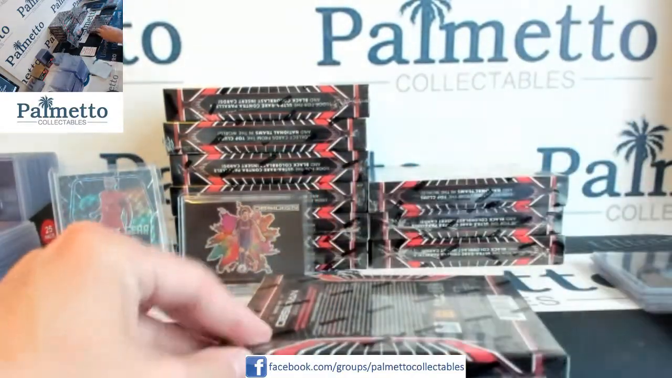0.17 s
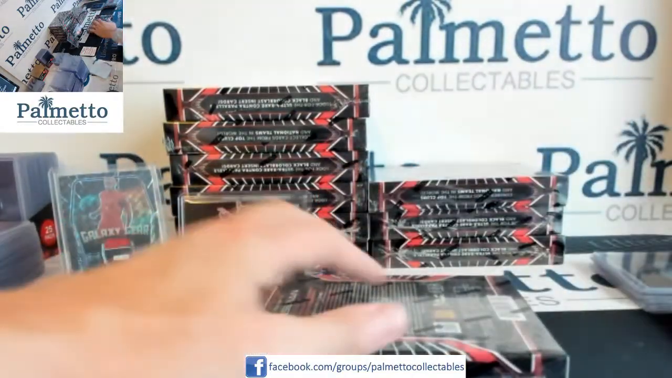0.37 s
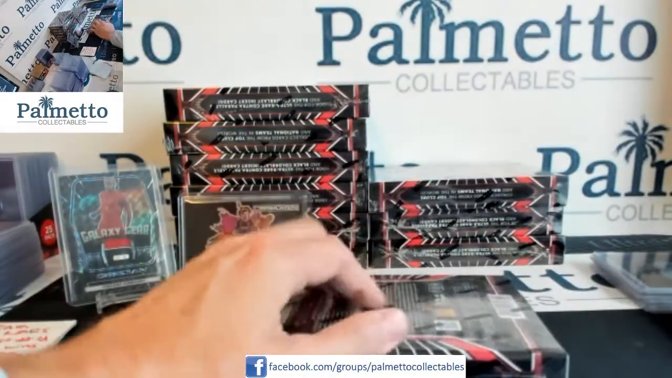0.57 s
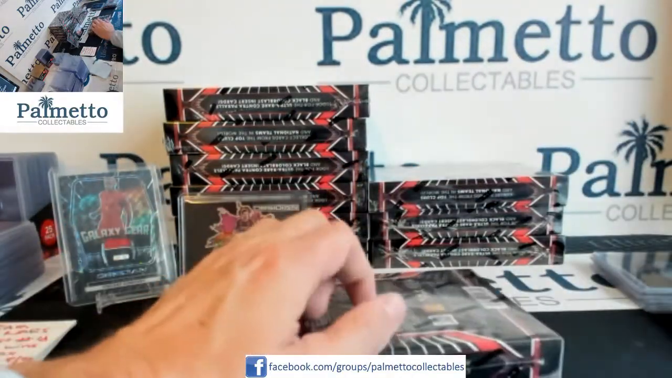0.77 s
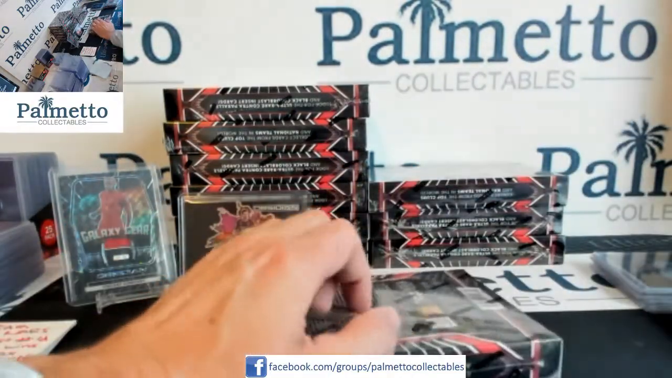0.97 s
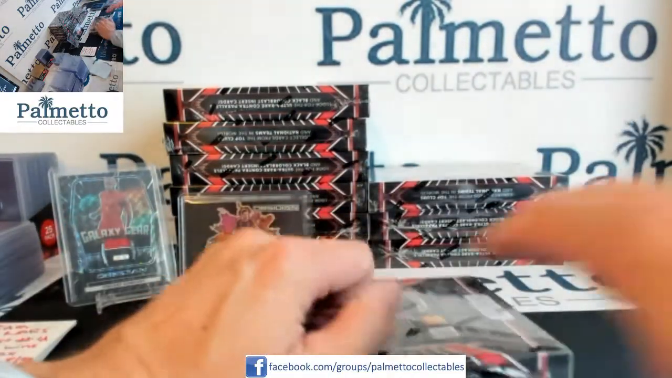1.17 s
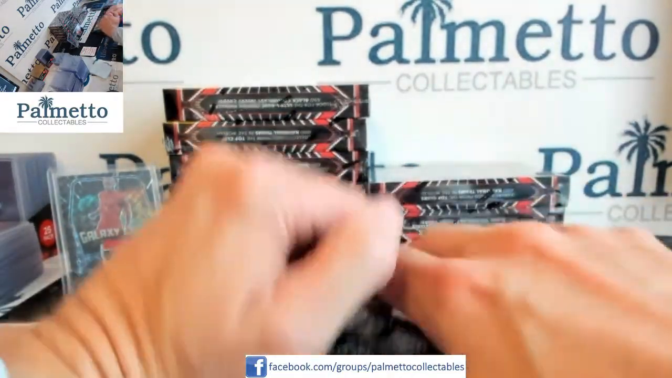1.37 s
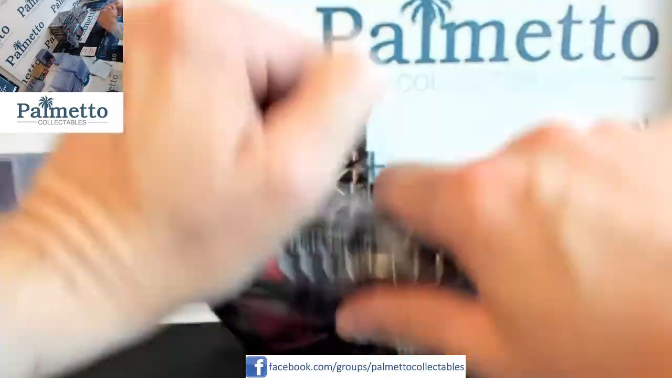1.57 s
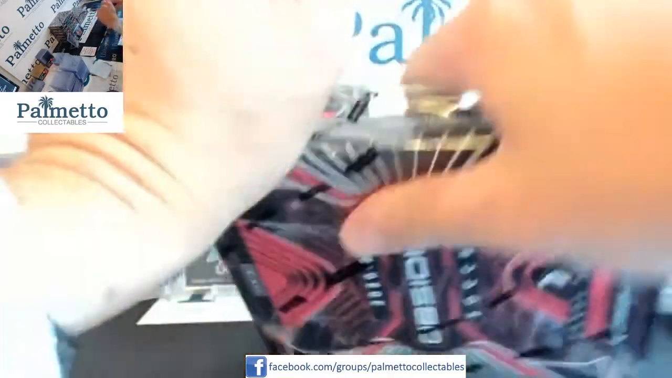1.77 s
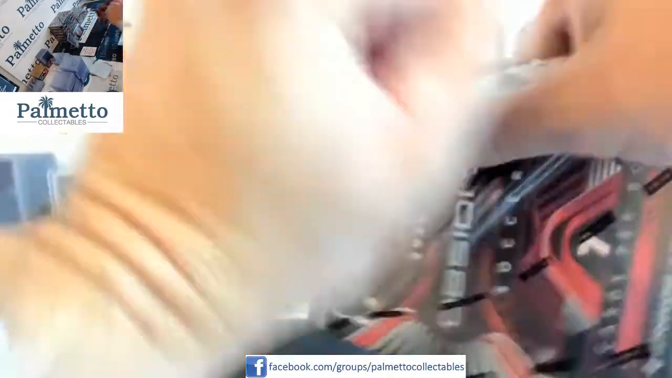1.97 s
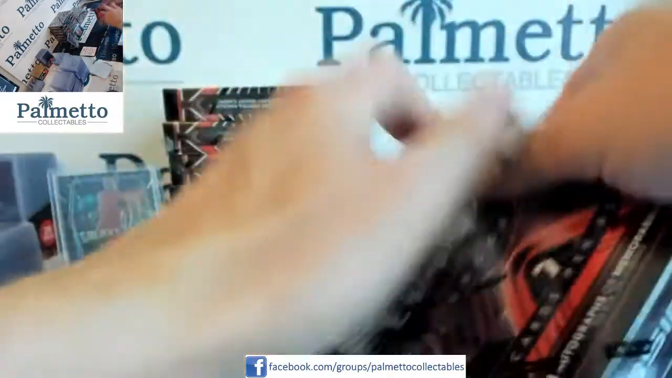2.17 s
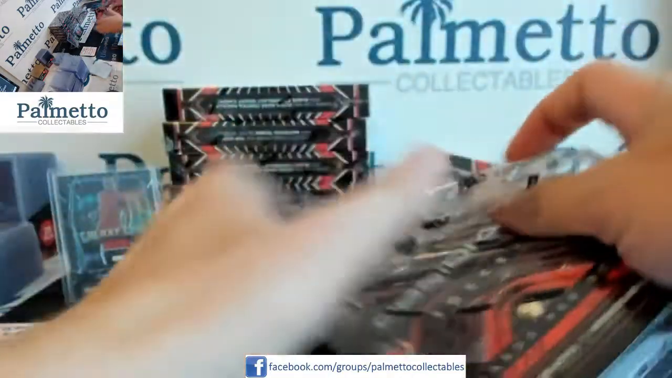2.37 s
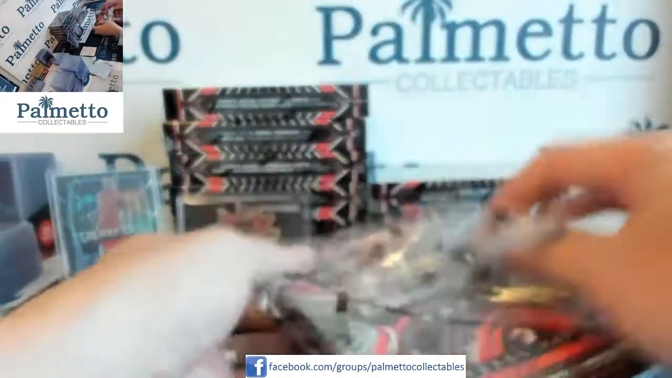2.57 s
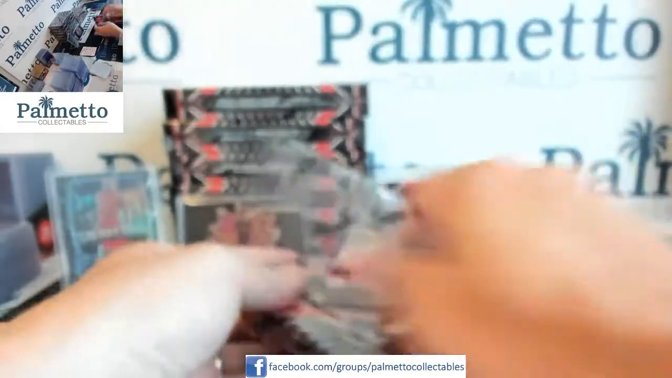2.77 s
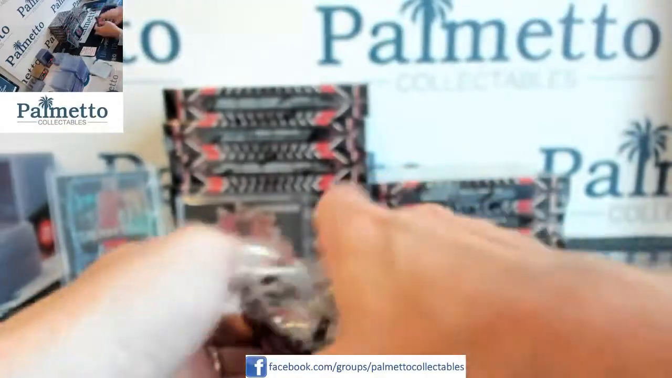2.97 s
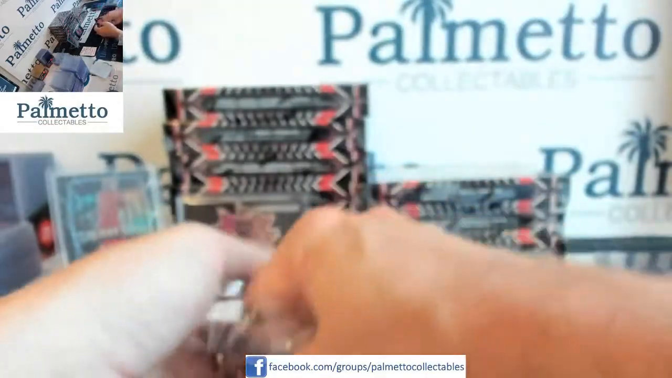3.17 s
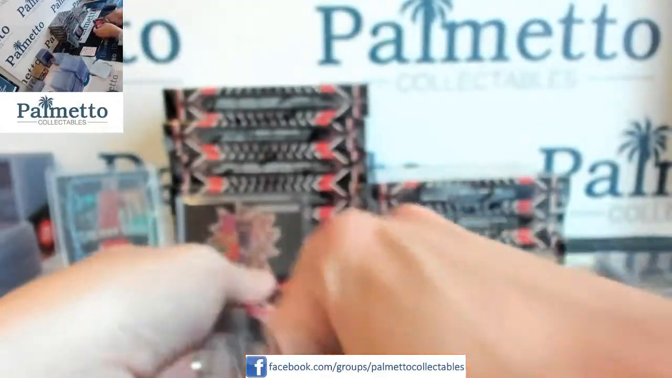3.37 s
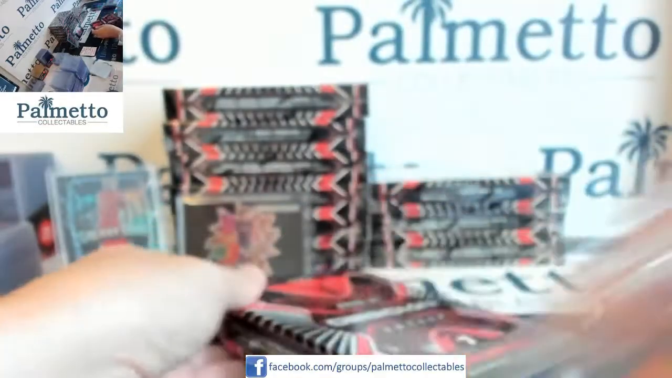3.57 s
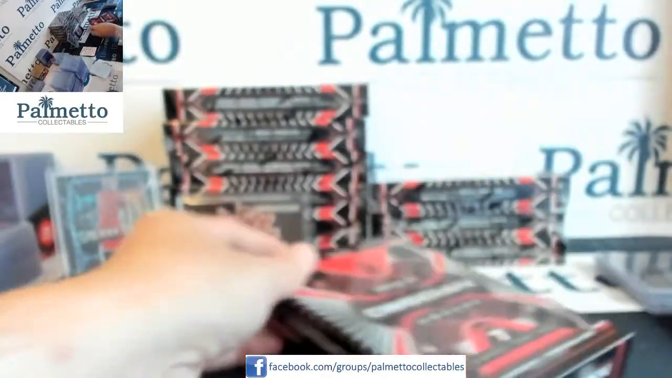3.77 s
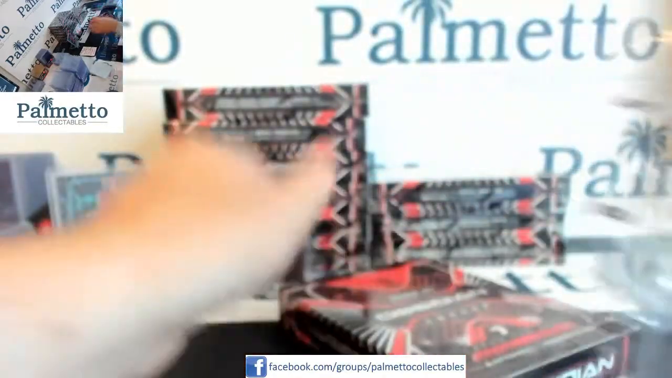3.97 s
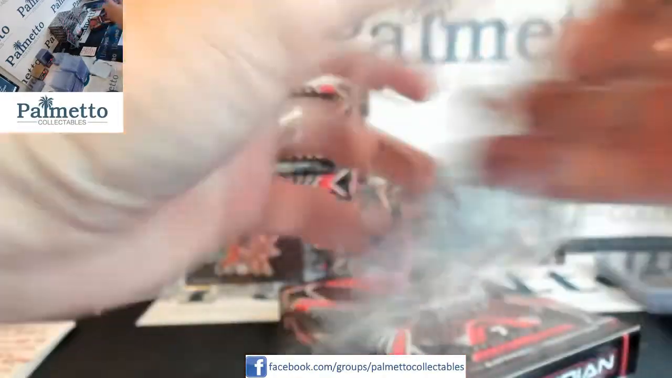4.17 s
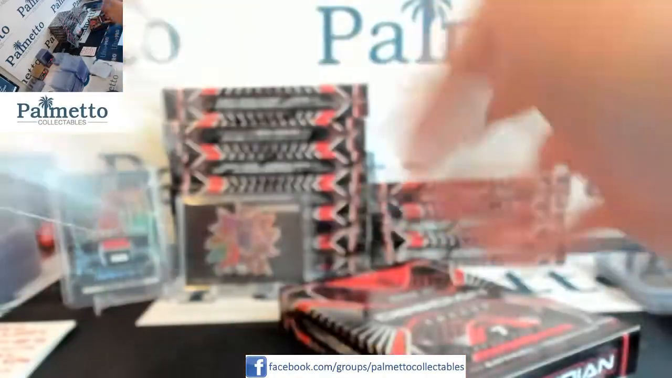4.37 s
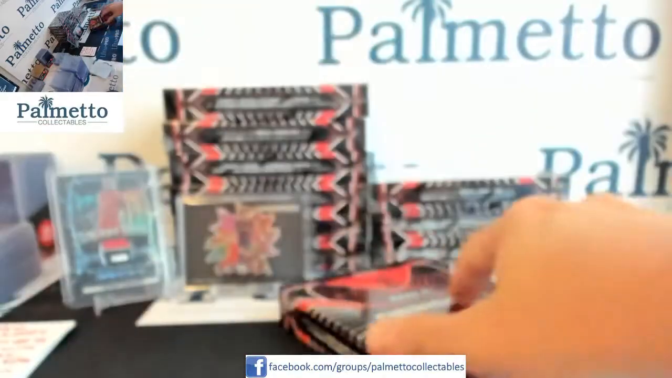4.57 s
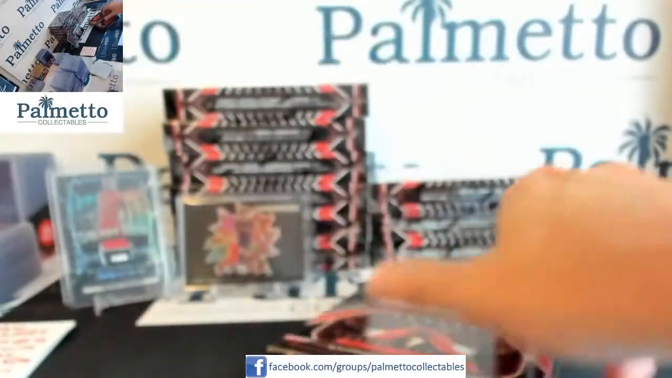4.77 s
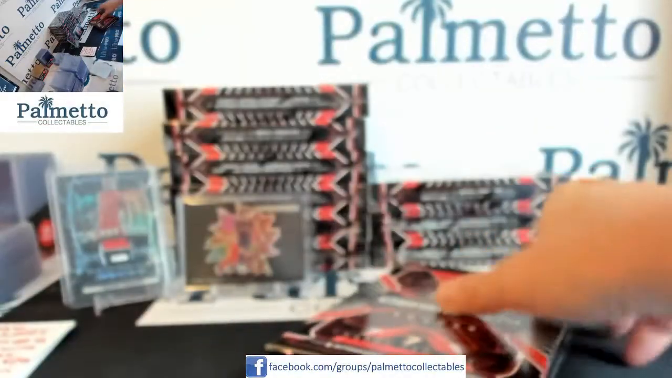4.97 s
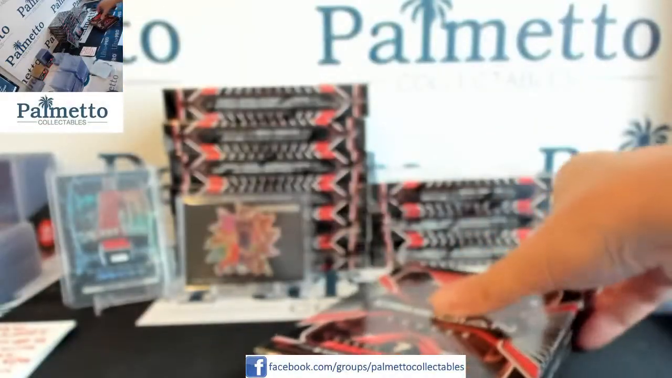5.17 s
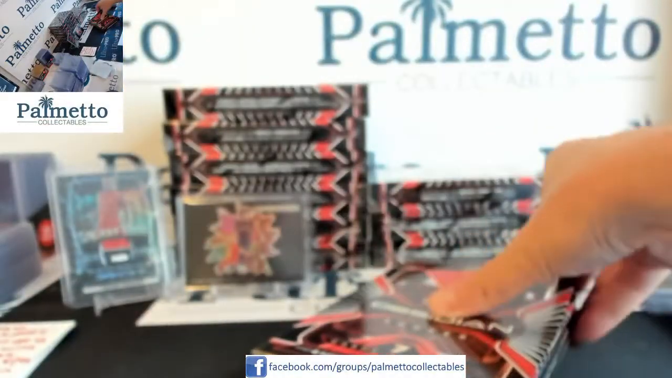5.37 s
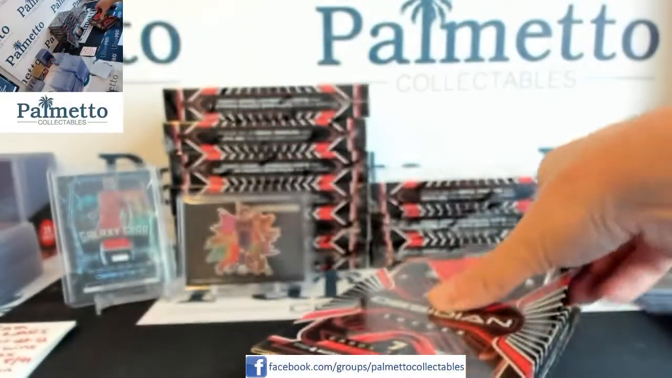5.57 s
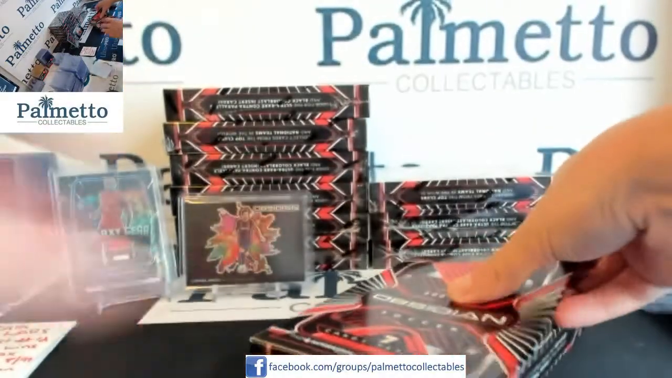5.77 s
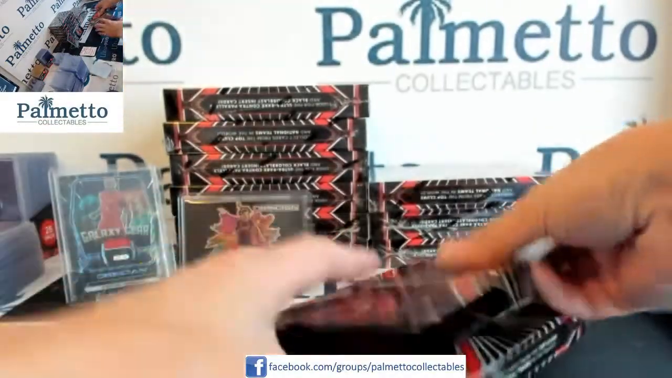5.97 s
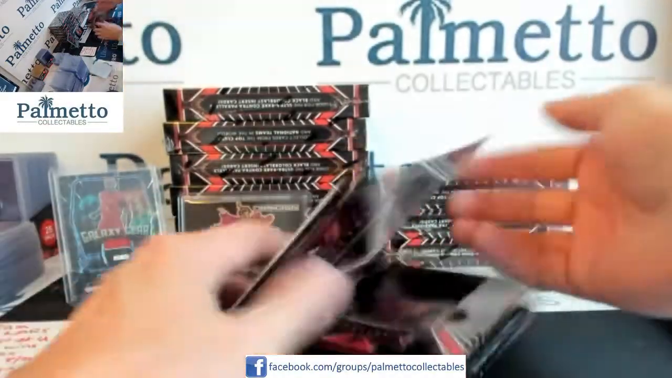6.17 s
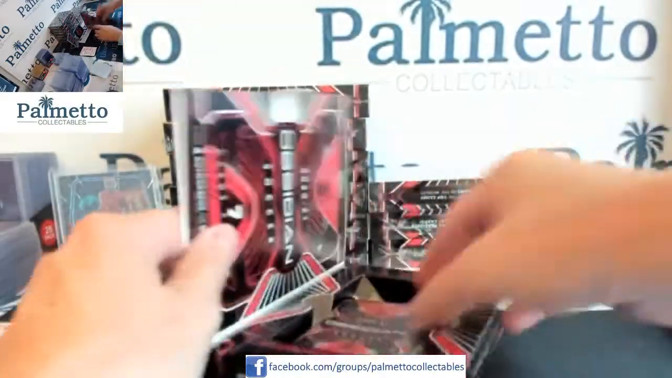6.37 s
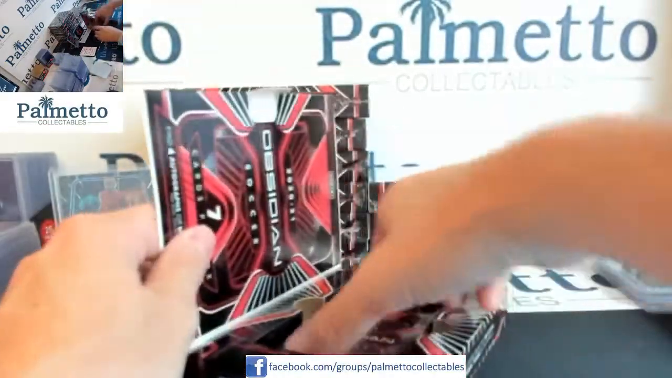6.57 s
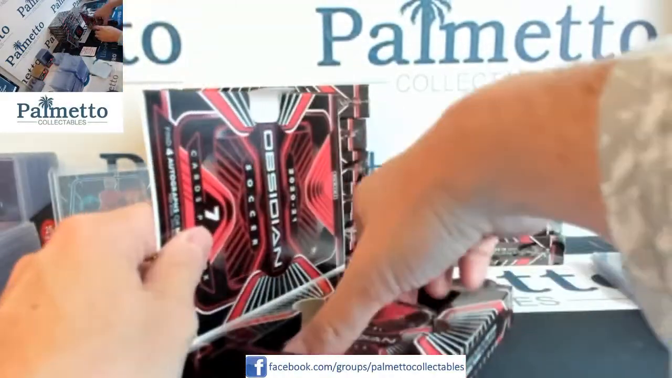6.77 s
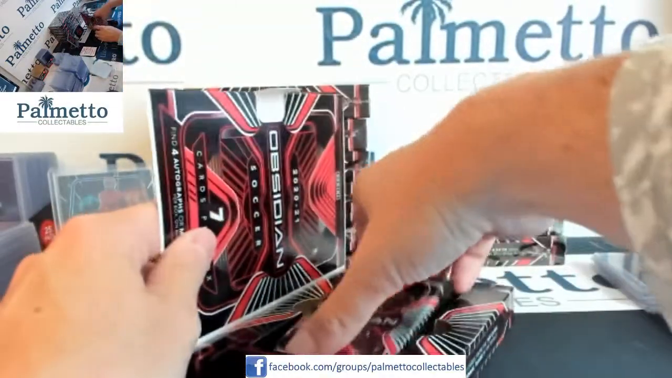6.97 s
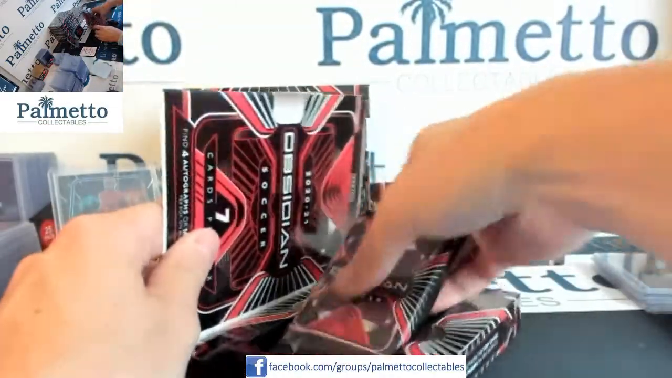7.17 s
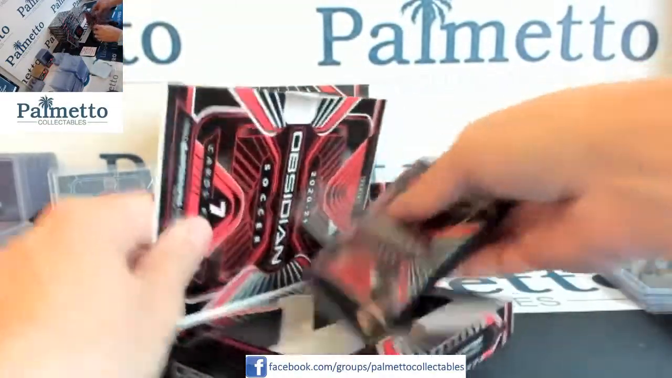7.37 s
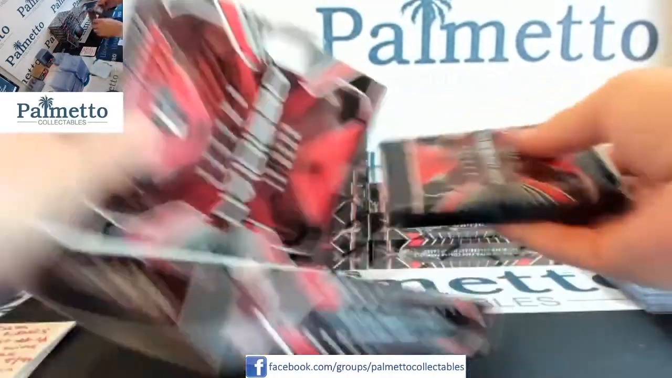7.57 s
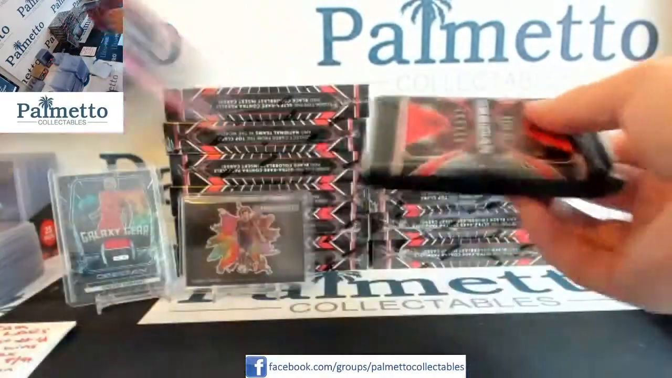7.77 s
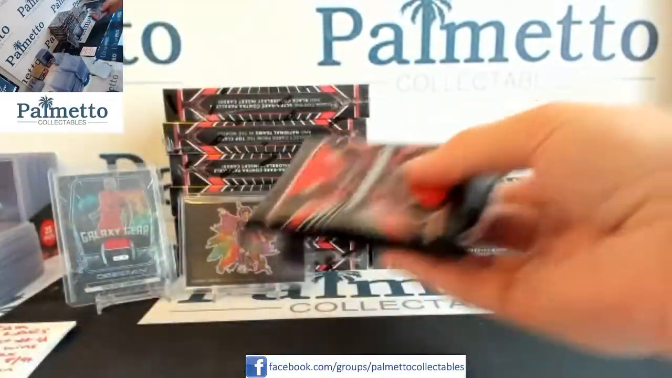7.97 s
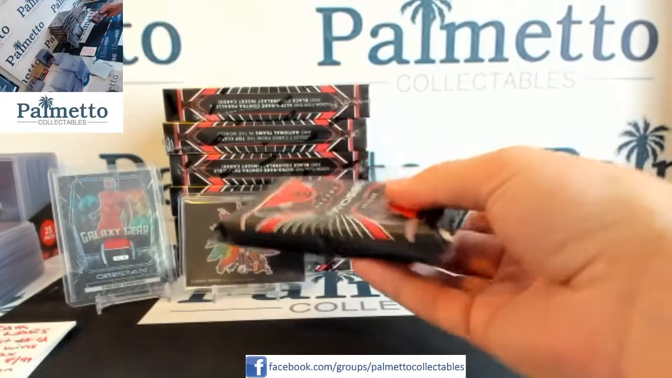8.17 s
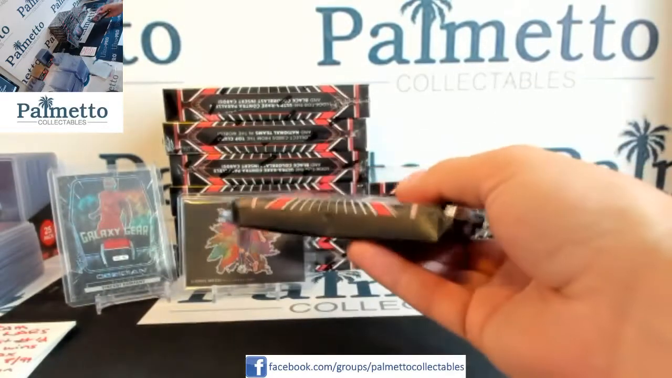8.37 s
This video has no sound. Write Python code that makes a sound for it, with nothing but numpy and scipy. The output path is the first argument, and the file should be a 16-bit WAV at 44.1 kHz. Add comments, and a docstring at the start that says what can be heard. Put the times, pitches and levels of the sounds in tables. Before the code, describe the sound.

Plastic film crackles and rips off a small cardboard box with dull knocks, then the lid scrapes open and a foil pack slides out.

```python
"""Hands strip the plastic film off a box of trading cards, close to a small microphone in a dry room.
First the film crackles, snaps and rips (noise grains, damped modes) as the box knocks on the table
(ringing panel and box modes). The loose film is then crumpled and tossed aside in finer grains.
Last, the cardboard lid scrapes open (dense grains, singing bands) and pops free (damped modes),
and a foil pack is slid out, fizzing, and ticks between the fingers (millisecond cracks)."""
import sys
import numpy as np
from scipy import signal
from scipy.fft import rfft, irfft, next_fast_len
from scipy.io import wavfile
from scipy.ndimage import uniform_filter1d, map_coordinates

SR = 44100
rng = np.random.default_rng(int(sys.argv[2]) if len(sys.argv) > 2 else 0)


def digitize_waveform(pressure):
    """Quantize a signal to 16-bit integers and store it at the path in sys.argv[1].

    Rows of a 2-D input are taken as channels; values are limited to [-1, 1].
    """
    field = np.atleast_2d(pressure).T
    bounded = np.clip(field, -1, 1)
    quanta = np.round(bounded * 32767).astype(np.int16)
    wavfile.write(sys.argv[1], SR, quanta)


N = 371454
TIME_S = np.arange(N) / SR
TOP_HZ = 16000  # band limit of the microphone and of the grain pitches

# Levels are relative, ahead of the trims in the functions.
# noise of the room, spectrum: [f/Hz, density/dB]
FLOOR_SPECTRUM = [(20, -10), (55, 4.5), (200, -5.5), (500, -5.5), (1200, -20), (7000, -24), (15000, -37)]
# reverberant tail: [f/Hz, t60/s]
ROOM_DECAY = [(500, 0.33), (2500, 0.33), (7000, 0.3), (15000, 0.082)]
# blows on the box: [t/s, struck panel level/dB, panel f/Hz, whole box level/dB]
BOX_KNOCKS = [(0.3745, -49, 530, -40), (0.3896, -34.5, 470, -32.5), (0.5952, -42.5, 242, -35.5),
              (0.6256, -37, 430, -29.5), (1.0418, -28.5, 614, -41.5), (1.3903, -15.5, 710, -16),
              (1.78, -25, 298, -21), (1.8638, -36, 527.5, -29), (2.164, -37.5, 667, -57),
              (2.8337, -33.5, 558, -38.5), (2.9143, -28.5, 940, -36), (3.0281, -43.5, 939, -34),
              (3.2409, -33.5, 960, -56), (3.5344, -36, 520.2, -67), (3.8187, -32, 480, -31),
              (3.8729, -44.5, 513.4, -33.5), (5.7963, -31, 957, -48), (6.1143, -29.5, 690, -24.5),
              (6.7626, -48, 225, -62)]
# modes of the box, nominal: [f/Hz, level/dB, t60/s]
BOX_MODES = [(155, -7, 0.057), (238, -4, 0.078), (370.8, -4, 0.081), (458, -0.5, 0.06), (610, -4, 0.1),
             (868, -8.5, 0.05)]
# stiff edges that spring free and ring: [t/s, level/dB, f/Hz, t60/s]
EDGE_FLICKS = [(5.7982, -23.5, 600, 0.057), (5.8, -41, 663, 0.2), (7.2685, -21, 1410, 0.025),
               (7.2693, -19, 2490, 0.016), (7.271, -42, 2484, 0.144)]
# short squeaky drags of a finger or an edge across box and wrapper: [middle t/s, level/dB, f/Hz]
SQUEAKY_DRAGS = [(0.501, -67, 3740), (4.455, -54.5, 1963), (4.546, -50.5, 1686), (4.645, -60.5, 520),
                 (5.21, -65, 751), (5.337, -60, 1764), (6.027, -50.5, 1640), (6.252, -50, 1172),
                 (7.106, -48, 2500), (8.166, -63, 3800)]
# card and foil in steady rubbing contact: [t/s, fizz level/dB, scrape level/dB]
STEADY_CONTACT = [(5.15, -100, -79.5), (5.39, -84, -69), (5.6, -76, -64), (5.74, -62, -53),
                  (5.96, -72, -63), (6.3, -72, -61), (6.4, -62, -56), (7.22, -63, -59), (7.41, -70, -62),
                  (7.57, -72.5, -76), (7.68, -99.5, -92), (7.74, -72.5, -71.5), (7.92, -78, -83.5),
                  (8.42, -81.5, -87.5)]
# separate pushes of the lid and the pack: [start t/s, length/s, fizz level/dB, scrape level/dB]
PUSHES = [(5.296, .055, -72, -65.5), (5.41, .025, -66, -53), (5.48, 0.07, -66, -54),
          (5.663, .065, -51.5, -41), (5.748, .04, -41.5, -36), (6.035, 0.051, -53, -57.5),
          (6.199, .06, -66, -56), (6.322, 0.06, -55, -51), (6.495, .1, -57, -48.5), (6.64, .09, -55.5, -50),
          (6.934, .04, -50.5, -52), (6.975, .068, -43.5, -40.5), (7.143, .06, -53, -46.5),
          (7.415, 0.0253, -56, -62), (7.712, 0.02, -61.5, -66), (7.825, 0.043, -61.5, -90),
          (7.97, .025, -60.5, -60.5), (8.192, 0.05, -68, -67.5), (8.324, 0.056, -67.5, -88.5)]
# cardboard scrape, spectrum: [f/Hz, density/dB]
SCRAPE_SPECTRUM = [(80, -32.5), (220, -12.5), (380, -9), (570, 2.5), (1050, 0), (1500, 0.5), (2300, 2.5),
                   (3050, -1), (3900, -15.5), (8000, -34)]
# foil fizz, spectrum: [f/Hz, density/dB]
FIZZ_SPECTRUM = [(1200, -31.5), (3000, -4), (4500, -0.5), (9500, -2.5), (12000, -8.5), (15500, -19)]
# pinpoint ticks of tiny wrinkles: [t/s, level/dB]
WRINKLE_TICKS = [(0.7042, -30), (0.827, -33.5), (1.07, -30.5), (1.27, -33), (1.566, -31.5), (1.8427, -29),
                 (1.8631, -26.5), (1.8703, -24.5), (1.9794, -27), (2.0431, -23.5), (2.1211, -26),
                 (2.162, -25), (2.189, -27), (2.4504, -34), (2.548, -33.5), (2.7053, -25.5),
                 (2.9906, -28.5), (3.3598, -30.5), (3.4376, -31), (3.471, -30), (3.852, -31.5),
                 (3.9725, -33), (4.098, -23), (4.349, -28), (4.9811, -50.5), (6.3602, -39), (6.551, -26.5),
                 (6.5625, -23), (6.6799, -19), (6.729, -26.5), (6.9427, -26), (7.3628, -39.5),
                 (7.7523, -52), (7.873, -34.5), (7.9986, -27), (8.0087, -31.5), (8.2053, -38.5),
                 (8.2337, -39), (8.2538, -41), (8.2749, -44)]
# broad creases that flip the sheet: [t/s, crack level/dB, sheet pop level/dB, facet f/Hz]
CREASE_SNAPS = [(0.123, -49, -46.5, 1780), (0.921, -34, -43.5, 9100), (1.0215, -31.5, -31.5, 7800),
                (1.042, -34, -37, 2420), (1.1244, -41, -39, 10000), (1.22, -44, -53.5, 2640),
                (2.102, -35, -46, 6040), (2.804, -43, -38, 2006), (3.2659, -29, -46.5, 4130),
                (5.797, -30, -28, 2002), (6.1133, -36.5, -30.5, 2500), (6.2037, -43.5, -37, 2430),
                (6.5196, -32, -36, 2310), (6.7828, -39, -49.5, 2440), (6.807, -43, -49, 2960),
                (7.169, -31, -40, 5670), (7.2475, -36, -38.5, 2270), (7.268, -29.5, -33, 2340),
                (7.2755, -37.5, -35.5, 2400), (7.481, -47.5, -64, 3680), (7.57, -42.5, -54.5, 2200),
                (7.9608, -43.5, -54, 2783), (8.0204, -45.5, -47, 6030), (8.1496, -41.5, -77, 3650)]
# rips, each a quick run of cracks: [t/s, length/s, crack level/dB, sheet pop level/dB]
FILM_RIPS = [(0.6237, .011, -36, -34), (1.3696, 0.016, -24, -25.5), (1.78, .026, -32.5, -30.5),
             (3.0258, .013, -27.5, -31), (3.3317, 0.0043, -26.5, -46.5), (3.529, 0.00936, -34.5, -34.5)]
# crack of one crease, spectrum: [f/Hz, density/dB]
CRACK_SPECTRUM = [(400, -23), (1200, -13), (2500, 4.5), (9000, 2.5), (12500, -6.5), (16000, -17.5)]
# pop of the sheet, spectrum: [f/Hz, density/dB]
POP_SPECTRUM = [(80, -14), (250, -13), (580, 2.5), (1500, 1), (2200, -3.5), (4000, -23.5), (9000, -50.5)]
# film held between tugs: [t/s, crackle level/dB, dull rustle of sheet and box level/dB]
STEADY_FILM = [(0, -60, -48.5), (.25, -81, -104), (.36, -94, -101), (.41, -75, -59), (.75, -68, -62),
               (1.15, -60, -57), (1.58, -59, -54), (1.69, -65, -67.5), (1.88, -52.5, -54.5),
               (2.2, -50, -57), (2.29, -62, -57.5), (2.37, -65, -65), (2.62, -61, -66), (2.74, -54, -52),
               (2.97, -53, -49), (3.52, -53, -57), (3.8, -57, -61), (4.05, -60.5, -67)]
# separate tugs and squeezes of the film: [start t/s, length/s, crackle level/dB, rustle level/dB]
FILM_TUGS = [(0.144, 0.015, -72, -57), (0.556, 0.0935, -59.5, -53), (0.795, 0.02, -64, -55),
             (0.913, 0.097, -62, -54.5), (1.016, 0.07, -53, -48), (1.24, 0.044, -67, -54),
             (1.364, 0.039, -48, -48), (1.715, 0.16, -52, -51), (1.925, 0.15, -48, -55),
             (2.094, 0.11, -44, -51), (2.395, 0.059, -63, -54), (2.482, 0.048, -52.5, -51),
             (2.645, 0.087, -45, -47.5), (3.009, 0.062, -43, -46), (3.219, 0.056, -43, -48.5),
             (3.345, 0.17, -44.5, -51.5), (3.715, 0.02648, -55, -50.5), (3.84, 0.0396, -56.5, -52),
             (3.955, 0.034, -52, -73)]
# loose film crumpled, tossed aside and settling: [t/s, crackle level/dB, rustle level/dB]
LOOSE_FILM = [(4.04, -55.5, -55.5), (4.112, -38.5, -48), (4.232, -42.5, -46), (4.318, -50.5, -64),
              (4.532, -57, -65), (4.768, -69.5, -79.5), (4.842, -84.5, -83), (4.95, -70, -72),
              (5.14, -95, -91)]
# small creases, spectrum: [f/Hz, density/dB]
CRACKLE_SPECTRUM = [(300, -31), (900, -8.5), (1600, -3), (2700, -1), (4500, -3), (7000, 0), (9500, -2),
                    (12000, -6.5), (15500, -16)]
# dull flexing of sheet and box, spectrum: [f/Hz, density/dB]
RUSTLE_SPECTRUM = [(50, -31.5), (110, -9), (190, -4), (330, -5.5), (510, 6), (740, -5), (1050, -1.5),
                   (1600, 0), (3000, -6.5), (7000, -44)]

# shape of a move: build-up, rate of dying away, speed-up of that per dB of firmness
TUG_ATTACK_S, TUG_FADE_DB_PER_S, TUG_SLIP_DB_PER_DB = .02, 210, .15
PUSH_ATTACK_S, PUSH_FADE_DB_PER_S, PUSH_SLIP_DB_PER_DB = .027, 381.5, .55
FIRM_DB = -54  # a move firmer than this ends in a slip: the harder it is, the more suddenly it stops
RIP_CRACKS_PER_S, RIP_FADE_DB = 370, 11.5  # pace of the run; how far it sinks towards its end


def amp(db):
    """dB to amplitude."""
    return 10 ** (np.asarray(db) / 20)


def unit(x):
    """Scale to rms 1."""
    return x / np.sqrt(np.mean(x ** 2) + 1e-20)


def blip(x):
    """Scale a transient to the energy of 2 ms at rms 1."""
    return x * np.sqrt(.002 * SR / (np.sum(x ** 2) + 1e-20))


def along(points, hz):
    """Interpolate (Hz, value) points on a log frequency axis."""
    f, v = np.transpose(points)
    return np.interp(np.log(hz + 1), np.log(f + 1), v)


def curves(rows):
    """One dB value per sample for each column; -120 dB outside the rows."""
    s, *columns = np.transpose(rows)
    return [np.interp(TIME_S, s, c, left=-120, right=-120) for c in columns]


def wobble(knots_per_s):
    """Smooth random curve."""
    return map_coordinates(rng.standard_normal(4096), [TIME_S * knots_per_s], mode="wrap")


def coloured(x, spectrum, size=2048):
    """Pass x through a causal minimum-phase filter with this spectrum."""
    level_db = along(spectrum, np.fft.rfftfreq(size, 1 / SR))
    cepstrum = irfft(np.log(amp(level_db)))
    cepstrum[1:size // 2] *= 2
    cepstrum[size // 2 + 1:] = 0
    impulse = irfft(np.exp(rfft(cepstrum)))
    return signal.fftconvolve(x, impulse)[:len(x)]


def add(track, s, sound):
    """Mix a sound into the track, in place, at time s."""
    part = track[max(round(s * SR), 0):][:len(sound)]
    part += sound[:len(part)]


def ring(t, hz, t60, rise=0.00048):
    """One damped mode that takes a moment to build up."""
    return np.sin(2 * np.pi * hz * t) * amp(-60 * t / t60) * (1 - np.exp(-t / rise))


def burst(t, t60, rise=0.00031):
    """A fresh puff of noise that swells and dies."""
    return rng.standard_normal(np.shape(t)) * amp(-60 * t / t60) * (1 - np.exp(-t / rise))


def narrow(pitch_hz, half_width_hz):
    """Fuzzy tone of rms 1: low-passed noise on a carrier of per-sample pitch."""
    lowpass = signal.butter(2, half_width_hz, fs=SR, output="sos")
    band = signal.sosfilt(lowpass, rng.standard_normal(len(pitch_hz)))
    return unit(band * np.sin(2 * np.pi * np.cumsum(pitch_hz) / SR))


def effort(steady, moves, attack_s, fade_db_per_s, slip_db_per_db):
    """Bright and dull level/dB: each move builds up, holds and dies away over the steady contact."""
    power = sum(amp(curves(rows)) ** 2 for rows in steady)
    t = np.arange(SR // 2) / SR
    for s, length_s, bright_db, dull_db in moves:
        fade = fade_db_per_s * amp(slip_db_per_db * max(dull_db - FIRM_DB, 0))
        shape = np.minimum(t / attack_s, 1) * amp(-fade * np.maximum(t - length_s, 0))
        for track, db in zip(power, (bright_db, dull_db)):
            add(track, s, (amp(db) * shape) ** 2)
    return 10 * np.log10(power)


def grains(level_db, spectrum, hz, rate, growth, spread_db, clump_db, t60, tone, bed, size=400):
    """Tiny slips and bucklings, each with its own pitch; harder handling sets off more of them."""
    density = rate * amp(growth * np.clip(level_db + 50, -30, 12))  # grains/s
    starts = np.flatnonzero(rng.random(N) < density / SR)[:, None]
    t = np.tile(np.arange(size) / SR, (len(starts), 1))
    pitch_hz = np.minimum(hz * np.exp(0.532 * rng.standard_normal(starts.shape)), TOP_HZ)
    strength = amp(spread_db * np.minimum(rng.exponential(size=starts.shape), 3.5))
    shapes = strength * (burst(t, t60) + tone * ring(t, pitch_hz, t60))
    places = starts + np.arange(size)
    sound = np.bincount(places.ravel(), shapes.ravel(), N + size)[:N]
    sound = coloured(sound * amp(clump_db * wobble(90)), spectrum)
    # the work of the fingers is shared out among the grains of each moment
    power = np.abs(uniform_filter1d(uniform_filter1d(sound ** 2, size=1500), size=1500))
    sound = sound / np.sqrt(power + 1e-3 * np.median(power) + 1e-20)
    # a light touch only slides, and makes more hiss than ticks
    hiss_gain = bed * amp(-.2 * np.clip(level_db + 46.0, -30, 0))
    mix = sound + hiss_gain * unit(coloured(rng.standard_normal(N), spectrum))
    mix_power = np.abs(uniform_filter1d(mix ** 2, size=8000))
    return amp(level_db) * mix / np.sqrt(mix_power + 1e-20)


def background():
    """Faint low noise of the room."""
    return amp(-78.0) * unit(coloured(rng.standard_normal(N), FLOOR_SPECTRUM))


def room(x, early_db, tail_db, count=10):
    """Table and stacked boxes echo within 1-9 ms; a short noise tail decays by frequency."""
    hz, t, z = signal.stft(rng.standard_normal(SR // 3), SR, nperseg=256)
    decay = amp(-60 * t / along(ROOM_DECAY, hz)[:, None])
    tail = signal.istft(z * decay, SR, nperseg=256)[1]
    early = np.zeros(len(tail))
    early[(rng.uniform(.001, .009, count) * SR).astype(int)] = rng.standard_normal(count)
    early = amp(early_db) * early / np.linalg.norm(early)
    tail = amp(tail_db) * tail / np.linalg.norm(tail)
    return signal.fftconvolve(x, early + tail)[:N]


def box_body(t):
    """Box modes: where the blow lands sets each sign, the grip shifts each pitch."""
    body = np.zeros(len(t))
    for hz, level_db, t60 in BOX_MODES:
        gripped_hz = hz * (1 + .025 * rng.standard_normal())
        body += rng.choice([-1, 1]) * amp(level_db) * ring(t, gripped_hz, t60, rise=0.0023)
    return blip(body)


def knocks():
    """A panel of the box gives for a few cycles, the contents rattle and the box rings on."""
    out, t = np.zeros(N), np.arange(SR // 4) / SR
    for s, panel_db, hz, box_db in BOX_KNOCKS:
        # a hard blow buckles the card and so stops ringing sooner
        cycles = np.interp(panel_db, [-28, -15], [11, 4.5])
        panel = blip(ring(t, hz, t60=cycles / hz, rise=.8 / hz))
        rattle = blip(coloured(burst(t, t60=0.062), RUSTLE_SPECTRUM))
        box = blip(box_body(t) + 0.66 * rattle)
        thud = blip(ring(t, hz=115, t60=0.041, rise=0.00083))  # the table under the box
        add(out, s, amp(panel_db) * panel + amp(box_db - 5.5) * box + amp(box_db - 22.5) * thud)
    return out


def flicks():
    """Stiff edges spring free and ring as single damped modes."""
    out, t = np.zeros(N), np.arange(SR // 4) / SR
    for s, db, hz, t60 in EDGE_FLICKS:
        add(out, s, amp(db) * ring(t, hz, t60))
    return out


def drags(length_s=0.044):
    """Skin or card sticks and slips for a moment, in one pitch band."""
    out, swell = np.zeros(N), np.hanning(round(length_s * SR))
    for s, db, hz in SQUEAKY_DRAGS:
        tone = narrow(np.full(len(swell), hz), half_width_hz=400)
        add(out, s - length_s / 2, amp(db) * swell * tone)
    return out


def squeak(scrape_db, low_hz, high_hz, glide, half_width_hz):
    """The rubbed edge sings in two bands that climb and grow with the speed of the stroke."""
    speed_db = np.clip(scrape_db + 40, -25, 0)  # scrape level stands for speed
    stretch = amp(glide * speed_db + .25 * wobble(14))
    bands = narrow(low_hz * stretch, half_width_hz) + 1.2 * narrow(high_hz * stretch, half_width_hz)
    return amp(scrape_db + 1.2 * speed_db) * unit(bands)


def sliding():
    """Cardboard sticks and slips in dense grains and sings when pushed fast; the foil fizzes along."""
    fizz_db, scrape_db = effort([STEADY_CONTACT], PUSHES,
                                PUSH_ATTACK_S, PUSH_FADE_DB_PER_S, PUSH_SLIP_DB_PER_DB)
    scrape = grains(scrape_db + 2 * wobble(28), SCRAPE_SPECTRUM, hz=1400, rate=1700, growth=.7,
                    spread_db=3.8, clump_db=3, t60=.009, tone=.7, bed=.25)
    fizz = grains(fizz_db, FIZZ_SPECTRUM, hz=6000, rate=2200, growth=.4,
                  spread_db=3.5, clump_db=2, t60=.004, tone=1, bed=.38)
    edge = squeak(scrape_db, low_hz=2150, high_hz=2780, glide=0.04, half_width_hz=230)
    return amp(-1) * scrape + amp(-3.5) * edge + fizz


def ticks():
    """A tiny wrinkle flips in a millisecond and leaves the sheet still."""
    out, t = np.zeros(N), np.arange(SR // 100) / SR
    for s, db in WRINKLE_TICKS:
        crack = blip(coloured(burst(t, t60=.003, rise=.0001), CRACK_SPECTRUM))
        facet = blip(ring(t, rng.uniform(3500, 9000), t60=0.0028))
        add(out, s, amp(db - 10) * blip(crack + 0.88 * facet))
    return out


def rips():
    """A tear runs from crease to crease at an uneven pace, each crack with its own pitch."""
    for s, length_s, crack_db, pop_db in FILM_RIPS:
        count = max(round(length_s * RIP_CRACKS_PER_S), 1)
        for k in range(count):
            jitter = min(k, 1) * rng.uniform(-.5, .5)  # none on the first crack
            run = (k + jitter) / count
            sink_db = RIP_FADE_DB * run ** 2
            facet_hz = 5500 * np.exp(.3 * rng.standard_normal())
            yield s + run * length_s, crack_db - sink_db, pop_db - sink_db, facet_hz


def snaps():
    """A crease flips: a crack with the ring of its facet, and a pop of the sheet around it."""
    out, t = np.zeros(N), np.arange(SR // 20) / SR
    for s, crack_db, pop_db, hz in list(CREASE_SNAPS) + list(rips()):
        crack = blip(coloured(burst(t, t60=0.005, rise=.0001), CRACK_SPECTRUM))
        facet = blip(ring(t, hz, t60=0.0043))
        shiver = blip(coloured(burst(t, t60=.024), CRACKLE_SPECTRUM))
        pop = blip(coloured(burst(t, t60=0.015) + 0.095 * burst(t, t60=0.02), POP_SPECTRUM))
        snap = blip(crack + 0.97 * facet + 0.67 * shiver)
        add(out, s, amp(crack_db) * snap + amp(pop_db) * pop)
    return out


def film():
    """Bright crackle of small creases, finer in loose film than taut, over duller flexing of the sheet."""
    moves = FILM_TUGS, TUG_ATTACK_S, TUG_FADE_DB_PER_S, TUG_SLIP_DB_PER_DB
    taut_db = effort([STEADY_FILM], *moves)[0]
    loose_db = curves(LOOSE_FILM)[0]
    rustle_db = effort([STEADY_FILM, LOOSE_FILM], *moves)[1]
    crease = dict(spectrum=CRACKLE_SPECTRUM, hz=4800, growth=.6, clump_db=3.2, t60=.0048, tone=.9)
    taut = grains(taut_db, rate=650, spread_db=6.3, bed=.18, **crease)
    loose = grains(loose_db, rate=1600, spread_db=4.5, bed=.35, **crease)
    rustle = grains(rustle_db, RUSTLE_SPECTRUM, hz=560, rate=240, growth=.4,
                    spread_db=3.5, clump_db=2, t60=0.018, tone=0.8, bed=0.3)
    return amp(-0.66) * (taut + loose) + amp(-2.16) * rustle


def scene():
    """Sum the handling sounds, thin their bass, add room echo and noise; one channel."""
    hands = knocks() + flicks() + drags() + sliding() + ticks() + snaps() + film()
    # the microphone rolls off the bass below about 100 Hz
    highpass = signal.butter(2, 100, "highpass", fs=SR, output="sos")
    hands = signal.sosfilt(highpass, hands)
    echo = room(hands, early_db=-13.5, tail_db=-15.5)
    return (hands + echo + background())[None]


def record(dry):
    """The microphone keeps nothing above its band limit."""
    size = next_fast_len(N + SR // 2)
    kept = np.fft.rfftfreq(size, 1 / SR) < TOP_HZ
    return irfft(rfft(dry, size) * kept, size)[..., :N]


dry = scene()
out = record(dry)
digitize_waveform(out)
```